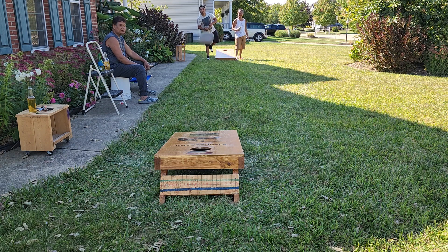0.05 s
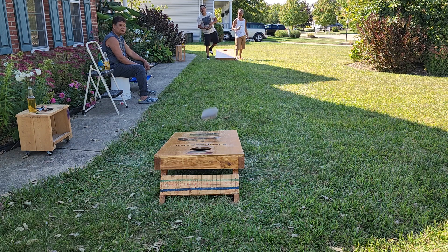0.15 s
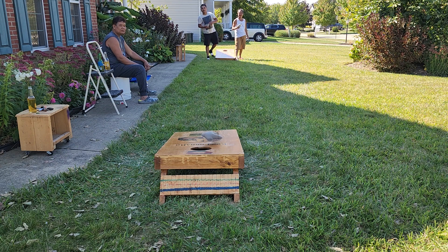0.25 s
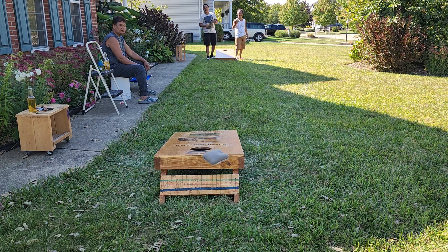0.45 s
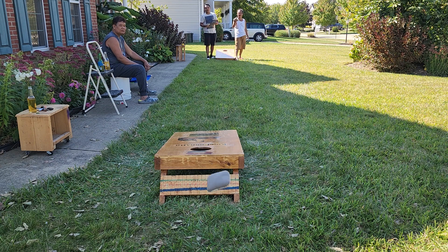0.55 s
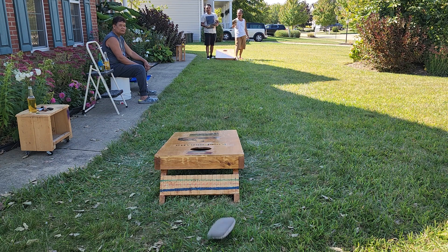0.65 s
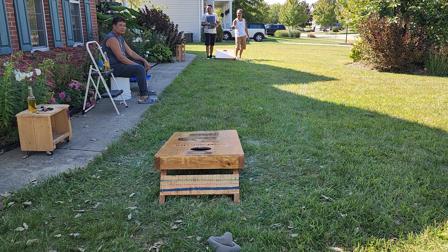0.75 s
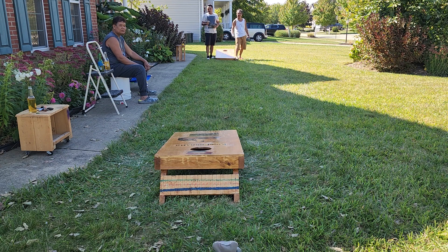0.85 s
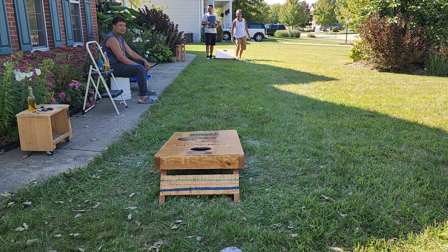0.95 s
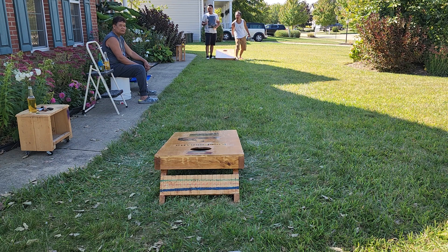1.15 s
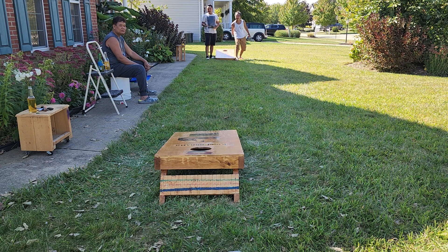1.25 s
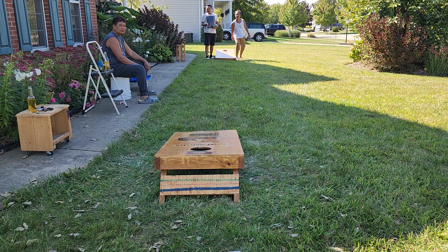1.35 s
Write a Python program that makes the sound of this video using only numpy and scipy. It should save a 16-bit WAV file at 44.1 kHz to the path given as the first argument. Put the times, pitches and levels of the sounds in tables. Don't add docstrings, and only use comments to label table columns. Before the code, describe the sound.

A beanbag slaps hard onto a hollow wooden board, slides off and drops softly into grass

```python
import sys
import numpy as np
from scipy import signal
from scipy.io import wavfile

SR = 44100
rng = np.random.default_rng(int(sys.argv[2]) if len(sys.argv) > 2 else 0)


def voltage_ratio(level):
    return 10 ** (np.asarray(level, float) / 20)


def waveform_to_disk(signal):
    frames = np.transpose(np.atleast_2d(signal))
    scaled = np.clip(frames, -1, 1) * 32767
    samples = np.round(scaled).astype(np.int16)
    wavfile.write(sys.argv[1], SR, samples)


N = 61739
TIME = np.arange(N) / SR

# [t/s, level/dB, softness cut-off f/Hz]
CONTACTS = [
    (.2228, -30, 3000),
    (.2245, 0, 3000),
    (.2281, -2.3, 3000),
    (.2336, -19.5, 3000),
]
# [f/Hz, level/dB]
YARD_COLOUR = [(180, -36.5), (300, -20.5), (395, -10), (828, -12.5), (999, -16), (2430, -17.5), (6000, -41),
               (7800, -71), (13200, -120)]
# [f/Hz, likeness]
FAR_LIKENESS = [(60, 0.95), (180, 1), (550, -0.16), (1650, -0.34), (4970, 0.22), (15000, 0.24)]
SLAP_LIKENESS = [(300, 0.67), (2000, 0.37), (6000, .1), (15000, .1)]


def at_hz(points, hz):
    f, value = np.transpose(points)
    return np.interp(np.log(hz), np.log(f), value)


def left_right(db):
    return voltage_ratio(db * np.array([[.5], [-.5]]))


def drift(rate):
    knots = rng.standard_normal(200)
    return np.interp(TIME * rate, np.arange(200), knots)


def impulse(s):
    return 1. * (np.arange(N) == int(s * SR))


def ring(drive, hz, t60):
    r = voltage_ratio(-60 / (t60 * SR))
    w = 2 * np.pi * hz / SR
    return signal.lfilter([0, np.sin(w)], [1, -2 * r * np.cos(w), r * r], drive + 1e-18)


def dull(x, hz):
    return signal.sosfilt(signal.butter(2, min(hz, 18000), fs=SR, output="sos"), x)


def bands(spectrum, likeness, patchy_db, grainy=False, shape=None, count=16):
    edges = np.geomspace(spectrum[0][0], min(spectrum[-1][0], 18000), count + 1)
    white = rng.standard_normal((2, 2, N))
    if grainy:
        grains_per_s, spread_db = 5000, 2.5
        size = voltage_ratio(spread_db * np.minimum(rng.exponential(1, N), 4))
        struck = rng.random(N) < grains_per_s / SR
        white = white * size * struck + 0.23 * white
    out, power = 0, 0
    for k, (low, high) in enumerate(zip(edges, edges[1:])):
        band_pass = signal.butter(2, [low, high], "band", fs=SR, output="sos")
        mid, side = signal.sosfilt(band_pass, white[k % 2])
        hz = np.sqrt(low * high)
        alike = np.clip(at_hz(likeness, hz), -1, 1)
        stereo = np.sqrt(1 + alike) * mid + np.sqrt(1 - alike) * side * [[1], [-1]]
        band = voltage_ratio(at_hz(spectrum, hz) + patchy_db * drift(25)) * stereo
        power += np.mean(band ** 2)
        out = out + band * (1 if shape is None else shape(hz))
    return out / np.sqrt(power)


def dying(t60, rise_s):
    age = np.maximum(TIME - CONTACTS[1][0], 0)
    return (1 - np.exp(-age / rise_s)) * voltage_ratio(-60 * age / t60)


def board():
    # [f/Hz, level/dB, t60/s]
    panel = [(250.3, -8.5, .2), (250.5, -11.5, .29), (325.8, -14.3, .08), (352.1, -6.3, .086),
             (407.7, -2.5, .214), (460.1, -7.4, .058), (510.3, -13.2, .107), (555.6, -17.7, .11),
             (649.9, -5.4, .087), (807, -16.8, .091), (974.6, -16, .105), (1260, -20.6, .11),
             (1519, -20, .1), (2100, -20, .07)]
    panel_sense = [-1, 1, 1, 1, -1, -1, 1, -1, -1, 1, -1, -1, 1, 1]
    # [t/s, level/dB, f/Hz, t60/s]
    crack = [
        (.2240, 1.5, 2423, 0.0024),
        (0.2243, -9.5, 3880, 0.0041),
        (0.2241, -11.5, 3500, 0.0027),
    ]
    push = np.zeros(N)
    for s, db, hz in CONTACTS:
        push += dull(voltage_ratio(db) * impulse(s), hz)
    out = np.zeros(N)
    for (hz, db, t60), sense in zip(panel, panel_sense):
        out += sense * voltage_ratio(db) * ring(push, hz, t60)
    for s, db, hz, t60 in crack:
        out -= voltage_ratio(db) * ring(impulse(s), hz, t60)
    bass_cut_hz = 170
    return signal.sosfilt(signal.butter(2, bass_cut_hz, "high", fs=SR, output="sos"), out)


def hollow_box():
    # [f/Hz, level/dB, t60/s, start t/s]
    booms = [(80.1, -13.5, .37, .2289), (87.1, -10.3, .47, .2243), (90.5, -33, 1.4, .2239),
             (114.1, -10.7, .37, .2278), (118.3, -17.5, .54, .2289), (163.8, -13.7, .46, .2255),
             (195.4, -19, .36, .2249)]
    boom_sense = [-1, -1, -1, -1, 1, 1, 1]
    boom_pan = [.5, -0.49, .1, .4, -.6, .3, .2]
    swell_s, level_db = .007, -0.67
    out = np.zeros((2, N))
    for (hz, db, t60, s), sense, pan_db in zip(booms, boom_sense, boom_pan):
        age = np.maximum(TIME - s, 0)
        level = voltage_ratio(db - 60 * age / t60) * (1 - np.exp(-age / swell_s))
        out += sense * level * left_right(pan_db) * np.sin(2 * np.pi * hz * age)
    return voltage_ratio(level_db) * out


def yard(slap):
    # [delay t/s, level/dB, cut-off f/Hz, left over right level/dB]
    echoes = [
        (.05, -29.5, 4912, -4),
        (.085, -28, 795, 1.5),
        (0.141, -45, 1000, 1),
    ]
    # [f/Hz, level/dB]
    splash = [(400, -18), (800, -17), (1200, -13), (2000, -21), (4500, -35.5), (9500, -45), (12000, -49.5),
              (16000, -42)]
    # [f/Hz, t60/s]
    splash_t60 = [(300, 0.52), (1000, 0.084), (3000, .14), (6000, 0.19), (15000, 0.095)]
    splash_db, late_db, late_t60_s = -13, -40.5, 0.93
    out = np.zeros((2, N))
    for delay, db, hz, pan_db in echoes:
        lag = int(delay * SR)
        out[:, lag:] += voltage_ratio(db) * left_right(pan_db) * dull(slap, hz)[:N - lag]

    def fade(hz):
        return dying(at_hz(splash_t60, hz), 0.00081)

    out += voltage_ratio(splash_db) * bands(splash, SLAP_LIKENESS, 3.1, shape=fade)
    late = dying(late_t60_s, 0.026) * bands(YARD_COLOUR, SLAP_LIKENESS, 1.6, count=10)
    return out + voltage_ratio(late_db) * late


def rustle(rows, spectrum):
    swell = np.zeros(N)
    for s, db, rise, fall in rows:
        spread = np.where(TIME < s, rise, fall)
        swell += voltage_ratio(db) * np.exp(-.5 * ((TIME - s) / spread) ** 2)
    return swell * bands(spectrum, SLAP_LIKENESS, 1.5, grainy=True, count=12)


def sliding_bag():
    # [peak t/s, level/dB, rise t/s, fall t/s]
    shifts = [
        (.272, -52, .01, 0.006),
        (.295, -63.5, .015, 0.031),
        (.306, -56.5, .003, 0.0033),
        (.329, -63, .002, 0.0026),
        (.338, -63.5, .002, 0.0018),
        (.435, -67, .025, .022),
        (.49, -77.5, .03, .04),
    ]
    scuffs = [
        (.365, -45.5, 0.0033, 0.0038),
        (.398, -48, 0.0018, 0.0076),
        (.46, -53, 0.013, 0.021),
        (.59, -64, 0.025, 0.084),
    ]
    landing = [
        (.722, -57, 0.017, 0.015),
        (.738, -48, 0.0086, 0.0077),
        (.765, -59, 0.023, .03),
    ]
    # [f/Hz, level/dB]
    filling = [(1000, -6.5), (3000, -8), (9000, -9), (11500, 18.5), (15500, 6)]
    grass = [(410, -18), (700, -5), (2120, -0.5), (3130, -8.5), (3520, -2.5), (8550, -8.5), (10000, -9),
             (11700, -2.5), (15800, -11)]
    return rustle(shifts, filling) + rustle(scuffs, YARD_COLOUR[2:-1]) + rustle(landing, grass)


def knocks():
    # [t/s, level/dB, f/Hz, t60/s, left over right level/dB]
    lumps = [(0.2505, -23.5, 1460, 0.024, -2), (0.272, -32.5, 1250, 0.015, 12),
             (0.2756, -37.5, 2460, 0.012, .5), (.302, -39, 2500, 0.013, 3), (.308, -46, 1600, 0.014, 7),
             (0.313, -42, 2200, .012, 5), (.346, -53, 1830, 0.023, .5), (0.362, -57, 2300, 0.021, 3),
             (0.395, -47.5, 2510, 0.022, .5), (0.398, -62, 3350, 0.013, -1), (.428, -49.5, 1470, .02, .5),
             (.453, -46, 1790, 0.044, .5), (0.462, -54, 2200, .03, -3.5), (0.739, -50.5, 1100, 0.014, 2),
             (.731, -54, 1900, 0.027, 2.5)]
    push_s, length = .0025, 400
    fade = np.exp(-np.arange(length) / SR / push_s)
    out = np.zeros((2, N))
    for s, db, hz, t60, pan_db in lumps:
        start = int(s * SR)
        push = np.zeros(N)
        push[start:start + length] = rng.standard_normal(length) * fade
        tone = ring(push, hz, t60)
        out += voltage_ratio(db) * left_right(pan_db) * tone / np.abs(tone).max()
    return out


def cricket(pulses, db, half_s, sag_hz, late_s, pan_db, lead, echo_s, echo_db):
    out = np.zeros(N, complex)
    half = int(half_s * SR)
    u = np.arange(-half, half)
    for s, hz in pulses:
        gain_db, turns = rng.standard_normal(2)
        pitch = hz - sag_hz * ((u / SR + late_s) / half_s) ** 2
        wave = np.exp(2j * np.pi * (np.cumsum(pitch) / SR + turns))
        stroke = voltage_ratio(gain_db) * np.hanning(len(u)) ** 0.73 * wave
        at = u + int((s + late_s) * SR)
        keep = at < N
        out[at[keep]] += stroke[keep]
    echo = voltage_ratio(echo_db) * np.roll(out, int(echo_s * SR))
    ears = np.array([out * np.exp(1j * lead) + echo, out + 0.31 * echo])
    return voltage_ratio(db) * left_right(pan_db) * np.real(ears)


def crickets():
    # [t/s, top f/Hz]
    steady = [(s, 8290) for s in (0.036, 0.104, 0.163, 0.227, 0.292, 0.353, 0.418, 0.479, 0.54, 0.602, 0.66, 0.724, 0.781, .845, 0.905, .967, 1.025, 1.086, 1.143, 1.206, 1.267, 1.327, 1.389)]
    swooping = [(.039, 8150), (.096, 8200), (.152, 8200), (.209, 8250), (.265, 8300), (.492, 8000),
                (.558, 7960), (.612, 7950), (.665, 8000), (.719, 8020), (.772, 8020), (.828, 8080),
                (.884, 8080), (.941, 8100), (.998, 8090), (1.054, 8100), (1.111, 8120), (1.167, 8070),
                (1.224, 8090), (1.28, 8180), (1.336, 8180), (1.392, 8220)]
    lower = [(.522, 7610), (.578, 7550), (.635, 7650), (.694, 7580), (.755, 7660), (.818, 7600),
             (.88, 7720), (.944, 7680), (1.008, 7730), (1.073, 7640), (1.132, 7720), (1.195, 7770),
             (1.261, 7680), (1.324, 7780), (1.388, 7780)]
    far = [(.069, 4900), (.21, 5050), (.484, 5000), (.63, 4920), (.671, 4920), (.866, 4930), (1.209, 4780)]
    out = cricket(steady, -54.5, .013, 240, .0005, 3.0, .1, .0195, -6)
    out += cricket(swooping, -59, .012, 600, .003, 2.5, -2.8, .012, -22)
    out += cricket(lower, -59.5, .012, 330, .003, .5, .1, .016, -9)
    return out + cricket(far, -77, .022, 40, 0.00063, -13, 0.27, .02, -20.5)


def buzz():
    hz, strokes_per_s, t60_s, level_db = 6780, 50, 0.0061, -69
    beat = np.cumsum(strokes_per_s * (1 + 0.17 * drift(33))) / SR
    strokes = np.maximum(np.sin(2 * np.pi * beat), 0) ** 3 * voltage_ratio(1.5 * drift(40))
    tone = ring(ring(strokes * rng.standard_normal(N), hz, t60_s), hz, t60_s)
    tone = tone / np.sqrt(np.mean(tone ** 2) + 1e-20)
    return voltage_ratio(level_db) * np.array([tone, np.roll(tone, 3)])


def chorus():
    # [f/Hz, level/dB]
    song = [(5200, -29.5), (6000, -9), (6800, -2.5), (7600, 0), (8400, 5), (9150, 1.5), (9900, -5)]
    level_db, top_hz = -58, 9900
    steep_cut = signal.cheby2(12, 60, top_hz, fs=SR, output="sos")
    return voltage_ratio(level_db) * signal.sosfilt(steep_cut, bands(song, FAR_LIKENESS, 3.0, count=12))


def traffic():
    # [f/Hz, level/dB]
    rumble = [(15, -51.5), (25, -9.5), (114, -3), (187, -4), (228, -4.5), (365, -17), (436, -14.5),
              (1270, -34), (5200, -55.5), (6760, -74.5), (11400, -120)]
    # [t/s, level/dB]
    loudness = [(0, -41.5), (.5, -41.5), (.9, -42.5), (1.4, -44)]
    level = voltage_ratio(np.interp(TIME, *np.transpose(loudness)))
    return level * bands(rumble, FAR_LIKENESS, 1.5, count=18)


def hiss():
    # [f/Hz, level/dB]
    colour = [(2000, -3), (5000, -0.5), (8500, -4), (10200, -39.5), (11600, -11), (13000, -2), (16500, -1)]
    return voltage_ratio(-83) * bands(colour, SLAP_LIKENESS, .8, count=16)


def scene():
    slap = board()
    near = np.array([slap, np.roll(slap, -2)]) * left_right(.6)
    event = near + hollow_box() + yard(slap) + sliding_bag() + knocks()
    return event + crickets() + buzz() + chorus() + traffic() + hiss()


def band_limit(x):
    return signal.sosfilt(signal.butter(12, 15930, fs=SR, output="sos"), x)


def record(dry):
    duck_db, duck_s, top = -4, 0.01858, 1.8
    loud = np.maximum.accumulate(np.abs(dry).max(axis=0)) > .3
    r = np.exp(-1 / (duck_s * SR))
    ducked = dry * voltage_ratio(duck_db * signal.lfilter([1 - r], [1, -r], loud))
    return band_limit(top * np.tanh(ducked / top))


dry = scene()
out = record(dry)
waveform_to_disk(out)
```